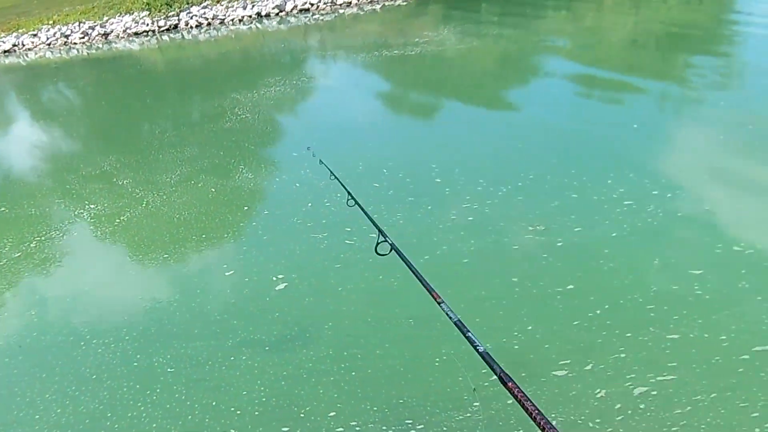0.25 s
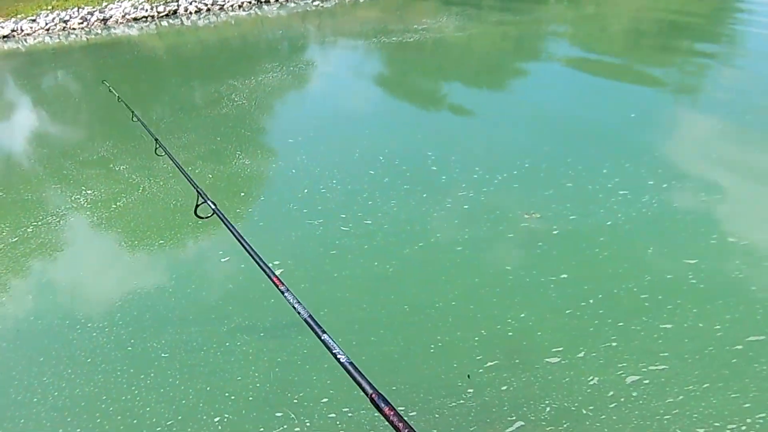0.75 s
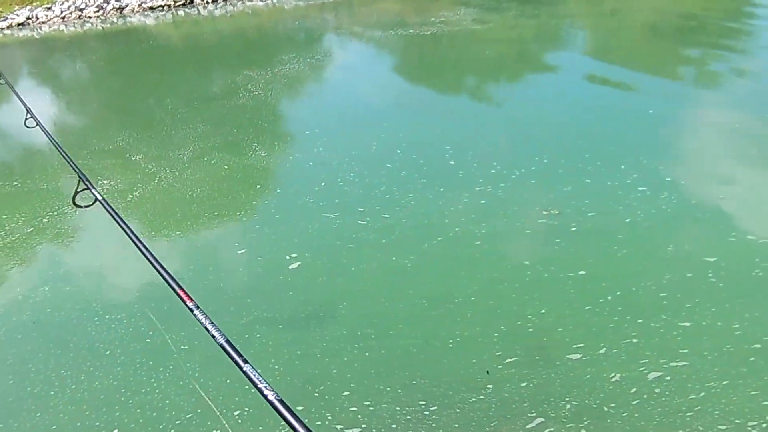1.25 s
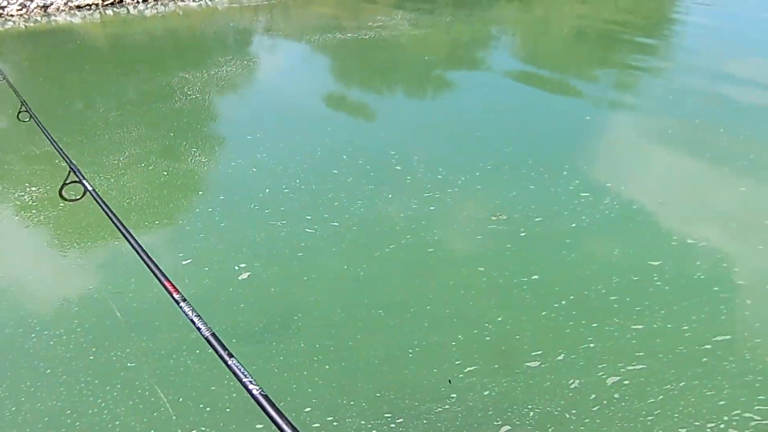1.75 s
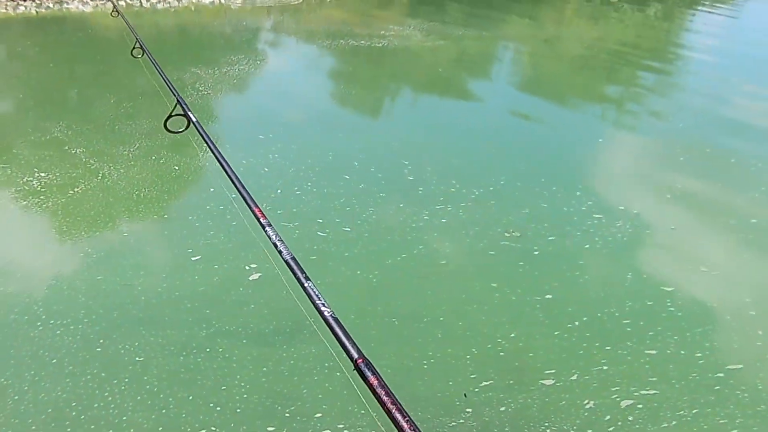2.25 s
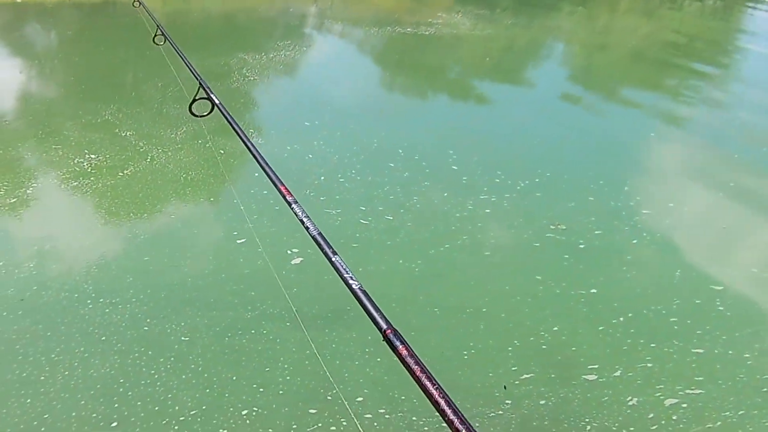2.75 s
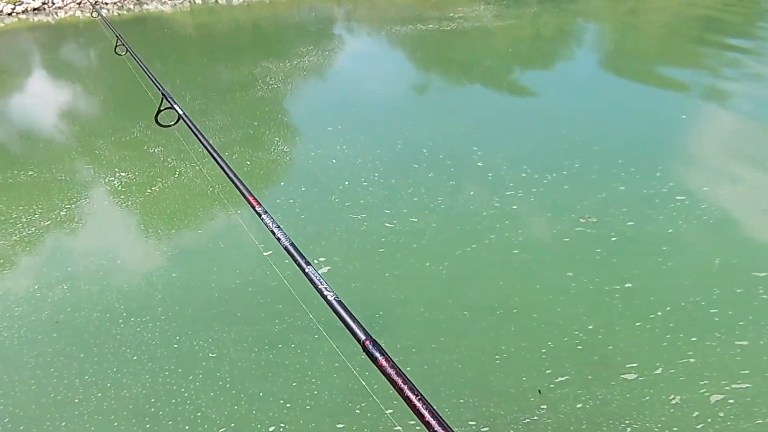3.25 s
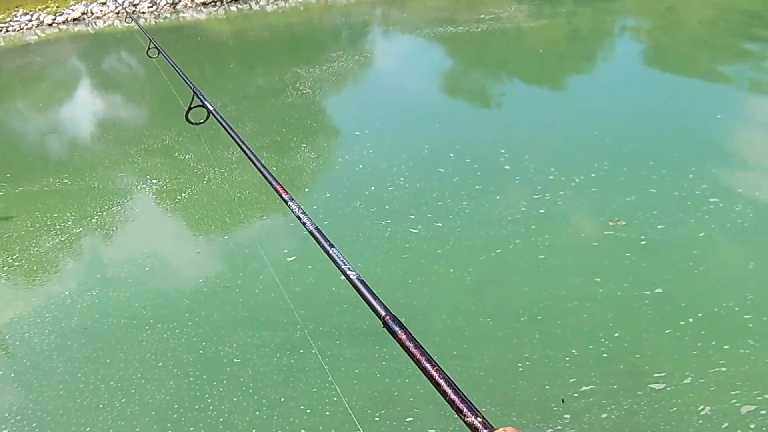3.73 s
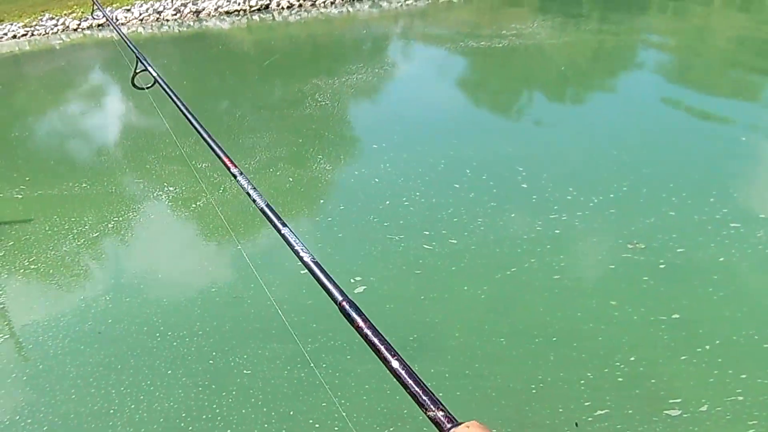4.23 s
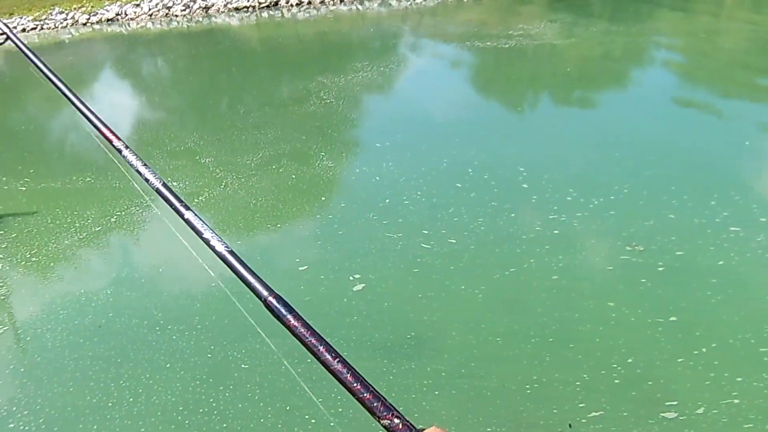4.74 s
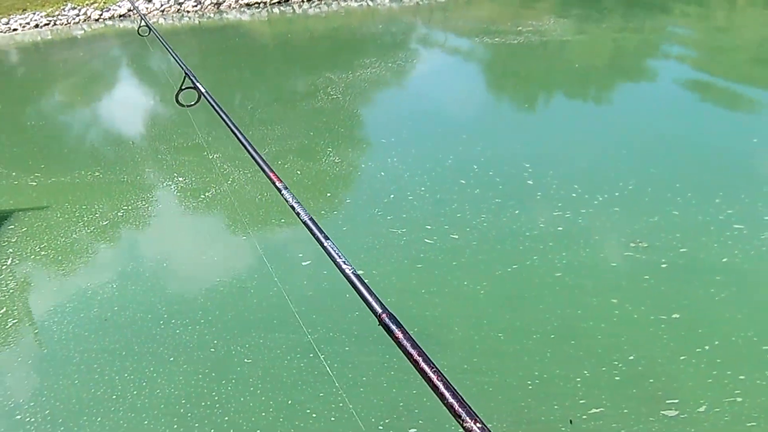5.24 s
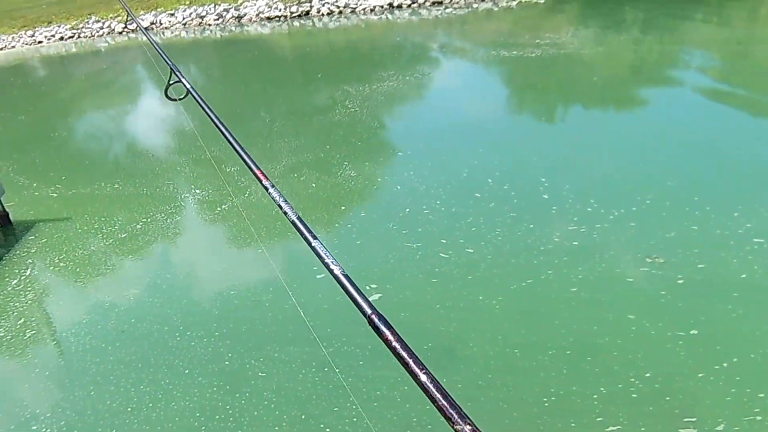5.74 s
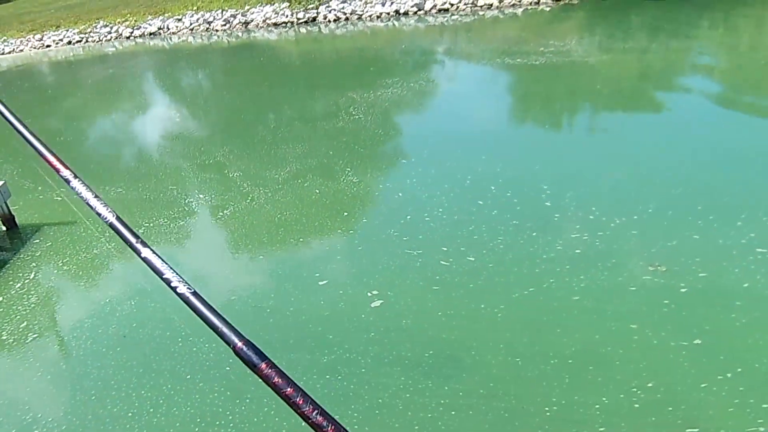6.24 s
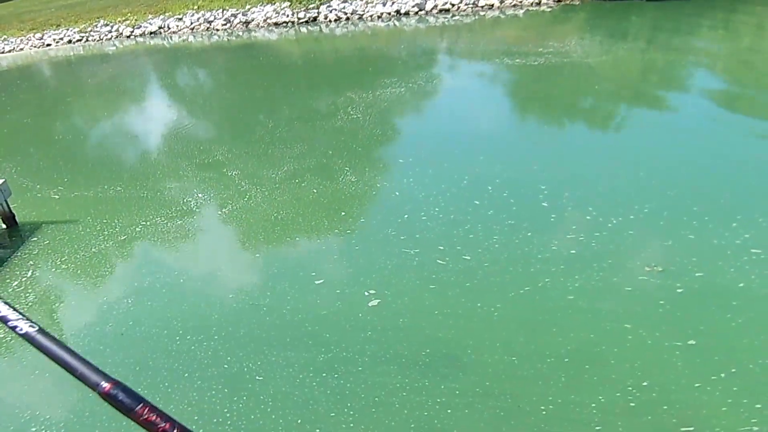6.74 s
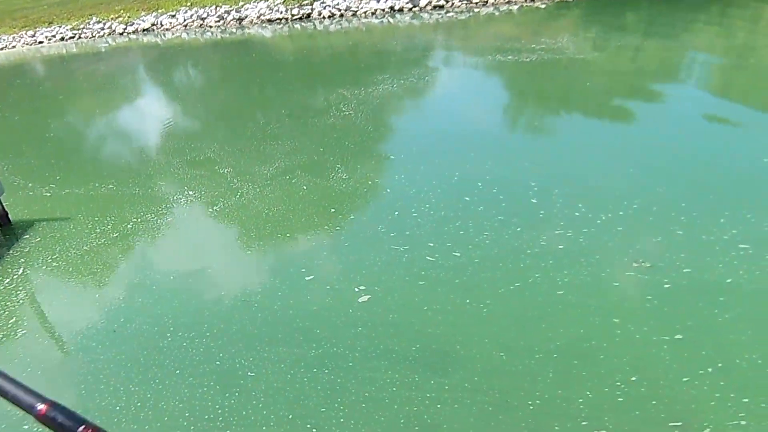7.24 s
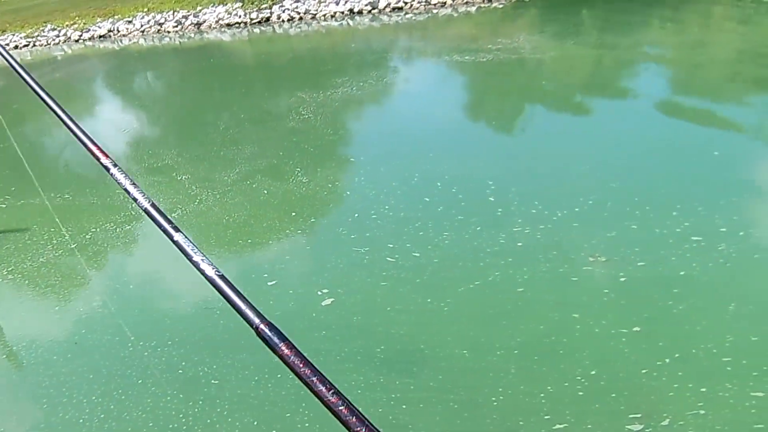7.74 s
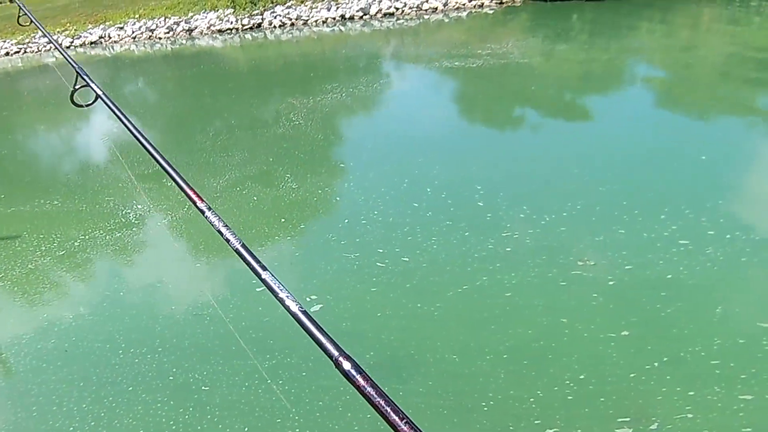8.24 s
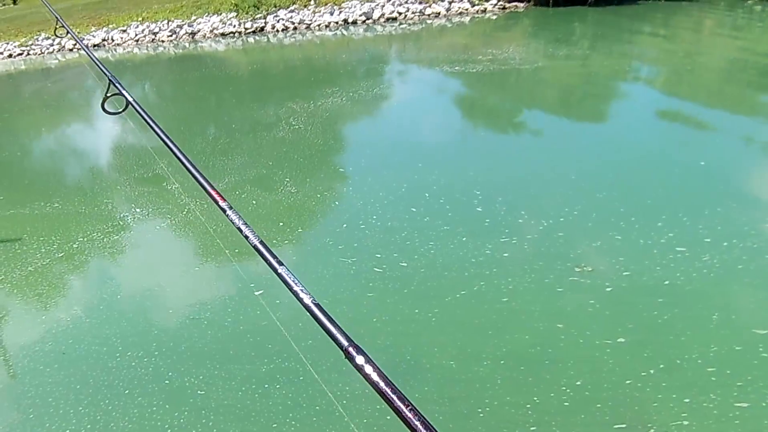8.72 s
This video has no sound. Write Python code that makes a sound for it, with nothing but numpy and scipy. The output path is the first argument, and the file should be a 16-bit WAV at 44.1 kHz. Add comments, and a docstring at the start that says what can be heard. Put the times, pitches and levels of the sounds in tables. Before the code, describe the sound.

A lawnmower runs far across a pond, a low steady hum with a quick throb over dull, airy roar. The hum is strong at first, sinks mid-way, then returns and eases again. Thin insect hiss lies behind. Close to the microphone, a fishing reel gives small dry clicks early on, and fingers make a few soft, dull bumps.

```python
"""A low hum throbs as it swells and fades, over a dull roar and a thin insect hiss: mowing far across a pond.
A two-ended blade sounds near 107 Hz and the engine's fourth order about 3.4 Hz away, so the two beat together.
Hum and engine are sums of harmonics; roar, insects and hiss are coloured noise with moving levels.
Close by, a fishing reel clicks and fingers bump the microphone: contact forces that ring decaying modes."""
import sys
import numpy as np
from scipy import signal
from scipy.fft import rfft, irfft
from scipy.io import wavfile

SR = 44100
rng = np.random.default_rng(int(sys.argv[2]) if len(sys.argv) > 2 else 0)


def dump_mix(stems):
    """Bounce the given channels to the path in sys.argv[1] as a 16-bit WAV at rate SR."""
    frames = np.atleast_2d(stems).T  # one column per channel
    limited = np.clip(frames, -1, 1)  # hard clip at full scale
    pcm = np.round(limited * 32767).astype(np.int16)
    wavfile.write(sys.argv[1], SR, pcm)


N = 396018

# Hiss: mean level in dB, and how many dB it rises per dB of hum.
HISS_DB, HISS_PER_HUM_DB = -72.5, 0.22

# Colours of the two insect choruses. Each row: frequency in Hz, relative density in dB per Hz.
LOWER_CHORUS_COLOUR = [(3400, -23), (3800, -5), (4100, 0), (4450, -1.5), (4800, -2.5), (5200, -19.5)]
UPPER_CHORUS_COLOUR = [(4800, -10.5), (5200, -2.5), (5650, 1.5), (6100, -1.5), (6450, -7), (6750, -18),
                       (7250, -9.5), (7600, -27.5)]
# Chorus levels before their shimmer. Each row: time in seconds, level in dB.
LOWER_CHORUS_LEVEL = [(0, -71), (.8, -66.5), (1.4, -67.5), (2.3, -65), (4.3, -71), (7.2, -68), (9, -69)]
UPPER_CHORUS_LEVEL = [(0, -76), (1.4, -78.5), (3.4, -73), (4.1, -75.5), (5.7, -72), (6.8, -76),
                      (7.7, -74.5), (9, -73.5)]

# Colours of the roar's layers. Each row: frequency in Hz, relative density in dB per Hz.
RUMBLE_COLOUR = [(12, -17), (25, 1), (45, -2), (110, 1), (200, 0), (290, -4.7), (420, -7), (700, -22)]
ROAR_COLOUR = [(250, -15.5), (400, 3), (530, 0), (680, 0.5), (850, 1), (1050, -5), (1300, -10),
               (1650, -13.5), (2000, -23.5), (3000, -35), (3600, -38.5), (6000, -54)]
UPPER_ROAR_COLOUR = [(700, -20.5), (950, 2.5), (1170, 2), (1450, -9.5), (1800, -14), (2200, -30),
                     (2800, -17.5), (3400, -31.5), (5000, -47)]
RASP_COLOUR = [(1500, -5), (1900, 3), (2200, -2.5), (2600, -7.5), (3000, -15), (3600, -28)]
# Levels of the roar's body and of its rasping upper band, before flutter and pulsing. Each row: time in
# seconds, level in dB.
ROAR_LEVEL_CURVE = [(0, -39), (.8, -38), (1.6, -38), (3.3, -37.5), (4.6, -38), (5.8, -39.2), (6.3, -38.7),
                    (7.2, -39), (8, -38.5), (9, -39)]
RASP_LEVEL_CURVE = [(0, -57), (1.4, -56.5), (2.3, -60.5), (3.6, -60.5), (4.3, -57.5), (6.5, -54.5),
                    (9, -56.5)]
# How well the mower's noise carries over the water. Each row: time in seconds, dB above the usual.
CARRY_CURVE = [(0, 1), (.6, 2.5), (2, 2.5), (2.9, 1.5), (3.6, 1.5), (4.6, -1.2), (9, 0)]
# Usual level in dB, and how many dB the layer moves per dB of carry.
RUMBLE_DB, RUMBLE_PER_CARRY_DB = -37, 0.43
UPPER_ROAR_DB, UPPER_ROAR_PER_CARRY_DB = -49.5, 1.6

# Finger touches on the microphone's case. Each row: start in seconds, force in dB, softness in seconds.
FINGER_BUMPS = [(1.4415, -14, .00005), (2.5148, -9.5, 0.00025), (4.5976, -17, 0.00004),
                (5.3574, -7.5, .0002)]
# The case's heavily damped modes. Each row: frequency in Hz, level in dB, t60 in seconds.
CASE_MODES = [(45, -14, 0.04), (130, 0, 0.022), (290, -1, 0.008), (520, -7, 0.005), (1000, -8, 0.002),
              (2600, -16, .001)]

# Reel clicks. Each row: start in seconds, force in dB, hardness of contact as a cutoff in Hz,
# chatter after the snap from 0 to 1.
REEL_CLICKS = [(0.221, -38.5, 3400, 0.13), (1.849, -26, 6500, .22), (1.8499, -33, 10000, .3),
               (1.8518, -32, 2400, .1), (1.8536, -28, 3000, .07), (1.8541, -42, 11000, .3),
               (1.8665, -35, 4700, 0.37), (1.8715, -49, 7000, .5), (1.971, -35, 3400, 0.09),
               (3.007, -36.5, 3500, 0.13)]
# The reel's modes. Each row: frequency in Hz, level in dB, t60 in seconds.
REEL_MODES = [(500, -7.5, 0.012), (710, -6.5, .01), (960, -2.5, .009), (1180, -3.5, 0.011),
              (1635, -1.5, .012), (1850, -11, .01), (2256, -6.5, .013), (2595, -7.5, .009),
              (3100, -7.5, .006), (3666, -13, 0.009), (4300, -7.5, 0.006), (4550, -14, 0.006),
              (5658, -15.5, 0.009), (6490, -19, .008), (7250, -11, 0.007), (8630, -21, .007),
              (9900, -17, 0.009), (10550, -15.5, .009), (11250, -15, .009)]

# The engine's speed wavers slightly around 27.6 firings per second.
# Each row: time in seconds, firings per second.
FIRING_RATE_CURVE = [(0, 27.6), (1.3, 27.7), (3, 27.62), (4.3, 27.42), (5.1, 27.64), (7, 27.49), (9, 27.53)]
# Fourth order, before its -1 dB balance and the drone trim: usual dB, dB moved per dB of carry.
ENGINE_DB, ENGINE_PER_CARRY_DB = -29, 0.98
# Low orders fading on their own, before the drone trim. Each row: time in seconds, dB of the lowest three,
# dB of the fifth, dB of the sixth and seventh.
FADING_ORDER_LEVELS = [(0, -33.5, -32, -36.5), (1, -35.5, -33, -40.5), (1.5, -35.5, -30.5, -37),
                       (2.4, -35, -31.7, -37.5), (3.2, -35, -32, -40.5), (4.2, -38.5, -34.5, -40),
                       (5.1, -37.5, -39, -38.5), (5.9, -38, -35, -37), (7.1, -36.5, -37, -37),
                       (7.7, -38.5, -40.5, -38.5), (8.2, -40.5, -32, -34), (9, -41, -35, -37.5)]
# The exhaust's higher orders. Each row: multiple of the firing rate, relative level in dB.
HIGHER_ORDERS = [(8, -5), (9, -4), (10, -7), (11, -10), (12, -5), (13, 0), (14, -3.5), (19, -5)]
# Level of those higher orders, before the drone trim. Each row: time in seconds, level in dB.
HIGHER_ORDER_LEVEL = [(0, -43.5), (1.3, -43.5), (2.5, -48), (4.3, -51), (5.6, -47.5), (7, -48),
                      (8.3, -45.5), (9, -46)]
MUFFLER_ORDER = 4  # order whose phase the muffler's smear leaves unshifted
MUFFLER_SMEAR = 0.2  # radians per squared order away from it

# The belt lets the blade lag the crankshaft, pacing the throb.
# Each row: time in seconds, share of the speed lost.
BELT_SLIP_CURVE = [(0, .0308), (3.2, .0295), (4.1, .0297), (4.5, .0385), (4.9, .0287), (5.4, .0283),
                   (5.9, .0248), (6.5, .0314), (7, .0319), (7.6, .031), (9, .0305)]
IN_STEP_S = 1.8755  # moment when blade and engine are in step
# Blade fundamental, before the drone trim; it swells, fades and returns.
# Each row: time in seconds, level in dB.
HUM_LEVEL = [(0, -21.5), (.4, -19.5), (2.1, -17), (3.7, -25.5), (4.2, -34.5), (5.1, -40.5), (5.45, -32),
             (6.1, -37.5), (6.55, -21), (7.3, -20.5), (8, -23.5), (9, -32)]
# Blade harmonics that fade on their own, before the drone trim. Each row: time in seconds, level in dB.
OCTAVE_LEVEL = [(0.0, -34), (0.55, -38.5), (1.4, -29), (2.95, -37.5), (3.25, -30.5), (3.83, -41),
                (5.2, -33), (5.7, -42.5), (6.15, -37), (6.3, -47), (6.62, -43), (7.1, -34.5), (7.5, -34),
                (7.85, -36.5), (8.98, -39)]  # takes OCTAVE_GAIN_DB on top
THIRD_LEVEL = [(0, -39), (.45, -46), (1.05, -39.5), (2, -53), (3.05, -41), (3.6, -53), (5.8, -45.5),
               (6.1, -52), (7.2, -42.5), (7.7, -43.5), (8.4, -50), (9, -44)]
FOURTH_LEVEL = [(0, -37.5), (.72, -38), (.95, -49), (1.55, -39), (2, -50), (2.45, -39.5), (3.1, -44),
                (4.1, -46), (4.8, -38.5), (5.6, -49), (6.4, -47), (7.25, -40.5), (8, -46), (9, -44)]
FIFTH_LEVEL = [(0, -47), (1, -52), (1.5, -43), (2.4, -49), (5.7, -54), (6.3, -45), (6.7, -49), (8, -43.5),
               (9, -52)]
OCTAVE_GAIN_DB = 4
# Fainter overtones, before swell and drone trim. Each row: multiple of the blade rate, level in dB.
FAINT_OVERTONES = [(6, -55), (8, -62)]

DRONE_TRIM_DB = -2.5  # on blade and exhaust together
CUTOFF_HZ = 15800


def from_db(db):
    """Decibels to gain."""
    return 10 ** (np.asarray(db) / 20)


def rms_one(x):
    """Scale to an rms of one."""
    return x / np.sqrt(np.mean(x ** 2) + 1e-20)


def in_time(rows):
    """Draw each column of a table as a curve, sample by sample."""
    s, *columns = np.transpose(rows)
    return [np.interp(np.arange(N) / SR, s, column) for column in columns]


def drift(rate_hz):
    """Slow random movement with a spread of one: low-passed noise made at every 40th sample."""
    r = np.exp(-80 * np.pi * rate_hz / SR)
    raw = rng.standard_normal(N // 40 + 2002)
    slow = signal.lfilter([1], [1, -2 * r, r * r], raw)[2000:]  # drop the filter's start
    return np.interp(np.arange(N) / 40, np.arange(len(slow)), rms_one(slow))


def noise(colour):
    """Noise of a given colour that falls 36 dB per octave beyond its ends; rms one."""
    hz, level_db = np.transpose(colour)
    octave = np.log2(np.maximum(np.fft.rfftfreq(N, 1 / SR), 1))
    beyond = np.abs(octave - np.clip(octave, np.log2(hz[0]), np.log2(hz[-1])))
    gain = from_db(np.interp(octave, np.log2(hz), level_db) - 36 * beyond)
    return rms_one(irfft(rfft(rng.standard_normal(N)) * gain, N))


def angle_of(per_s):
    """Running angle of a cycle, counted from the moment when blade and engine are in step."""
    turns = np.cumsum(per_s) / SR
    return 2 * np.pi * (turns - turns[round(IN_STEP_S * SR)])


def tones(angle, orders, scatter, scatter_hz, smear=0):
    """Harmonics through moving air, which scatters high and weak ones more; smear draws out their pulse."""
    top_db = max(db for order, db in orders)
    out = 0
    for order, db in orders:
        lag = smear * (order - MUFFLER_ORDER) ** 2
        spread = scatter * order * from_db((top_db - db) / 2)
        wander = drift(scatter_hz) + 1j * drift(scatter_hz)
        path = (1 + spread * wander) / np.sqrt(1 + 2 * spread ** 2)
        tone = np.sqrt(2) * np.real(path * np.exp(1j * (order * angle - lag)))
        out = out + from_db(db) * tone
    return out


def add(track, s, piece):
    """Add a short piece to a track at a given time."""
    start = round(s * SR)
    track[start:start + len(piece)] += piece[:N - start]


def ring(force, modes):
    """A body's decaying modes, each a two-pole resonator driven by a contact force."""
    out = np.zeros(N)
    for hz, db, t60 in modes:
        r = 1000 ** (-1 / (t60 * SR))
        w = 2 * np.pi * hz / SR
        # the tiny offset keeps the filter out of very slow arithmetic
        mode = signal.lfilter([0, np.sin(w)], [1, -2 * r * np.cos(w), r * r], force + 1e-18)
        out += from_db(db) * mode
    return out


def hiss(hum_db):
    """A faint, fluttering hiss under everything that rises a little with the hum."""
    level_db = HISS_DB + HISS_PER_HUM_DB * (hum_db - hum_db.mean())
    return from_db(level_db + 1.1 * drift(10)) * noise([(3000, -0.16), (16000, -0.83)])


def insects():
    """Two far choruses merge into narrow, shimmering bands of hiss."""
    [lower_db], [upper_db] = in_time(LOWER_CHORUS_LEVEL), in_time(UPPER_CHORUS_LEVEL)
    lower = from_db(lower_db + 1.7 * drift(21)) * noise(LOWER_CHORUS_COLOUR)
    upper = from_db(upper_db + 2.1 * drift(25)) * noise(UPPER_CHORUS_COLOUR)
    return lower + upper


def roar(blade_angle, firing_angle, carry_db):
    """Churned air and a rasping upper band, dulled by distance; all but the rumble pulse with blade and
    firings."""
    blade_pulse = 0.08 * np.cos(blade_angle) + 0.076 * np.cos(2 * blade_angle)
    firing_pulse = 0.06 * np.cos(firing_angle) + 0.06 * np.cos(5 * firing_angle)
    pulsing = 1 + blade_pulse + firing_pulse
    [body_db], [rasp_db] = in_time(ROAR_LEVEL_CURVE), in_time(RASP_LEVEL_CURVE)
    upper_db = UPPER_ROAR_DB + UPPER_ROAR_PER_CARRY_DB * carry_db
    rumble = from_db(RUMBLE_DB + RUMBLE_PER_CARRY_DB * carry_db) * noise(RUMBLE_COLOUR)
    body = from_db(body_db + 0.5 * drift(8.6)) * noise(ROAR_COLOUR)
    upper = from_db(upper_db + 0.76 * drift(16)) * noise(UPPER_ROAR_COLOUR)
    rasp = from_db(rasp_db + 0.92 * drift(8)) * noise(RASP_COLOUR)
    return rumble + pulsing * (body + upper + rasp)


def fingers():
    """Fingers touch the case, some softly and some firmly; each touch is a short, heavily damped bump."""
    t = np.arange(SR // 100) / SR
    force = np.zeros(N)
    for s, db, soft_s in FINGER_BUMPS:
        contact = t * np.exp(-t / soft_s)
        add(force, s, -from_db(db) * contact / contact.sum())
    return ring(force, CASE_MODES)


def reel(chatter_s, settle, settle_s):
    """Each snap is followed by a few milliseconds of chatter, then by loose parts settling."""
    t = np.arange(SR // 10) / SR
    fading = np.exp(-t / chatter_s) + settle * np.exp(-t / settle_s)
    force = np.zeros(N)
    for s, db, hard_hz, chatter in REEL_CLICKS:
        contact = chatter * rng.standard_normal(len(t)) * fading
        contact[0] = 1  # the snap itself
        softened = signal.sosfilt(signal.butter(4, hard_hz, fs=SR, output="sos"), contact)
        add(force, s, from_db(db) * softened)
    return ring(force, REEL_MODES)


def exhaust(angle, fourth_db):
    """Each firing is a puff; the muffler keeps its low orders and draws it out into a short ringing burst."""
    lowest_db, fifth_db, middle_db = in_time(FADING_ORDER_LEVELS)
    [higher_db] = in_time(HIGHER_ORDER_LEVEL)
    groups = [
        (lowest_db, [(1, -6.5), (2, 0), (3, -7)]),
        (fourth_db, [(4, -1)]),
        (fifth_db, [(5, 0)]),
        (middle_db, [(6, -6), (7, 0)]),
        (higher_db, HIGHER_ORDERS),
    ]
    out = 0
    for level_db, orders in groups:
        burst = tones(angle, orders, scatter=0.02, scatter_hz=2.8, smear=MUFFLER_SMEAR)
        out = out + from_db(level_db) * burst
    return out


def blade(angle, hum_db):
    """A nearly pure tone at the passing rate; shifting paths over the water fade overtones on their own."""
    out = from_db(hum_db) * np.sqrt(2) * np.cos(angle)
    # the octave enters with opposite polarity
    harmonics = [(2, OCTAVE_LEVEL, OCTAVE_GAIN_DB, -1), (3, THIRD_LEVEL, 0, 1),
                 (4, FOURTH_LEVEL, 0, 1), (5, FIFTH_LEVEL, 0, 1)]
    for order, level, gain_db, polarity in harmonics:
        [level_db] = in_time(level)
        overtone = tones(angle, [(order, 0)], scatter=0.042, scatter_hz=5)
        out = out + polarity * from_db(level_db + gain_db) * overtone
    swell = from_db(0.26 * (hum_db - hum_db.mean()))  # the faint ones rise a little with the fundamental
    return out + swell * tones(angle, FAINT_OVERTONES, scatter=0.078, scatter_hz=3.5)


def scene():
    """Far machinery and insects, near handling sounds."""
    [firings], [slip] = in_time(FIRING_RATE_CURVE), in_time(BELT_SLIP_CURVE)
    [hum_db], [carry_db] = in_time(HUM_LEVEL), in_time(CARRY_CURVE)
    passes = 2 * 2 * firings * (1 - slip)  # two turns a firing, two blade ends a turn
    blade_angle, firing_angle = angle_of(passes), angle_of(firings)
    background = hiss(hum_db) + insects() + roar(blade_angle, firing_angle, carry_db)
    handling = fingers() + reel(chatter_s=0.0013, settle=0.098, settle_s=0.02)
    engine = exhaust(firing_angle, ENGINE_DB + ENGINE_PER_CARRY_DB * carry_db)
    drone = from_db(DRONE_TRIM_DB) * (engine + blade(blade_angle, hum_db))
    return (background + handling + drone)[None]


def record(dry):
    """The deepest bass and the top are cut; the ends are eased over 130 samples."""
    from_start = np.arange(N)
    to_nearest_end = np.minimum(from_start, from_start[::-1])
    ease = np.sin(np.pi / 2 * np.minimum(1, to_nearest_end / 130)) ** 2
    x = signal.sosfilt(signal.butter(2, 16, "high", fs=SR, output="sos"), dry * ease)
    return signal.sosfilt(signal.ellip(10, 0.1, 80, CUTOFF_HZ, fs=SR, output="sos"), x)


dry = scene()
out = record(dry)
dump_mix(out)
```